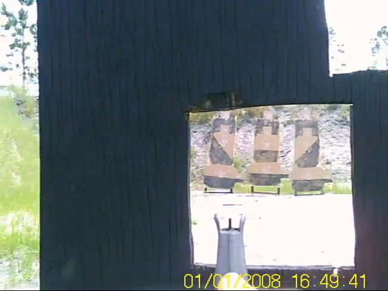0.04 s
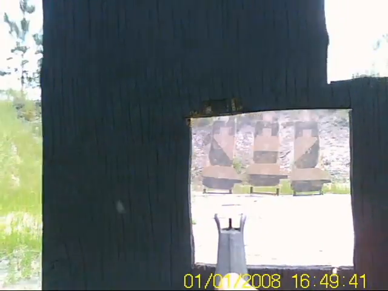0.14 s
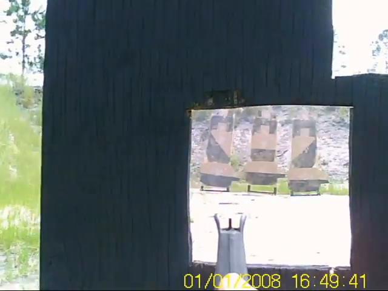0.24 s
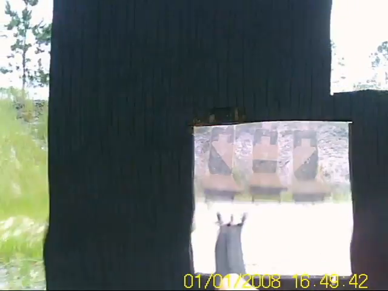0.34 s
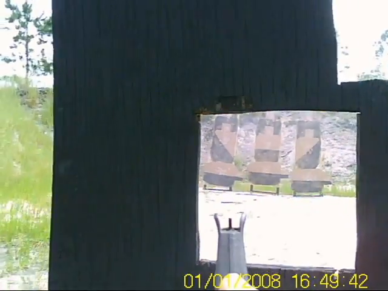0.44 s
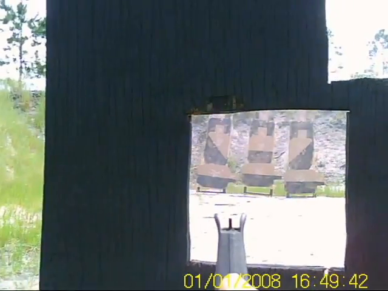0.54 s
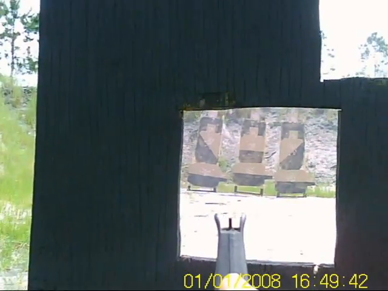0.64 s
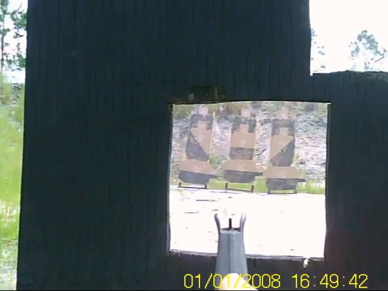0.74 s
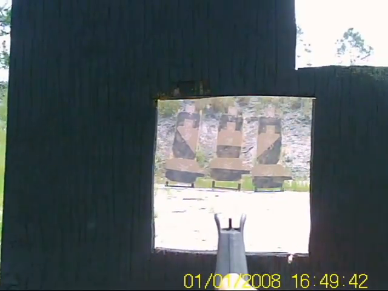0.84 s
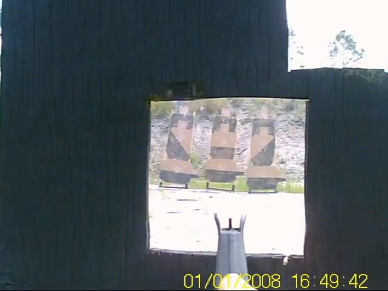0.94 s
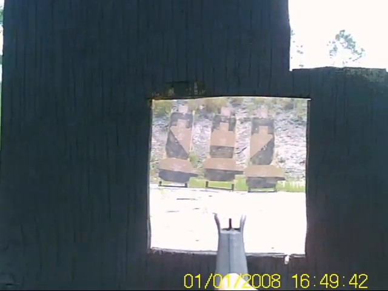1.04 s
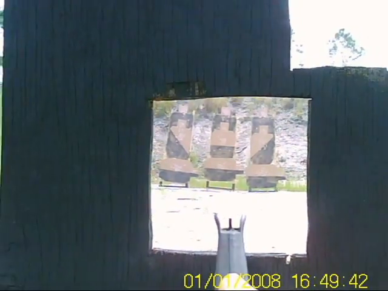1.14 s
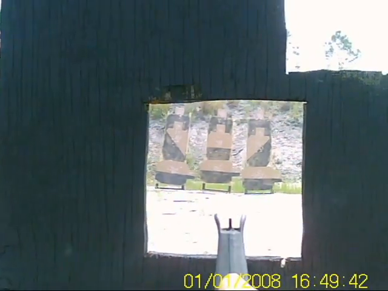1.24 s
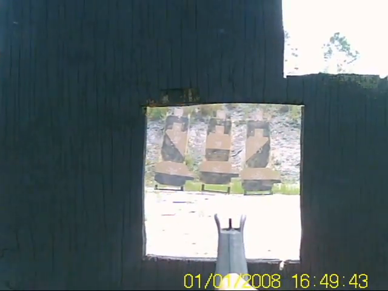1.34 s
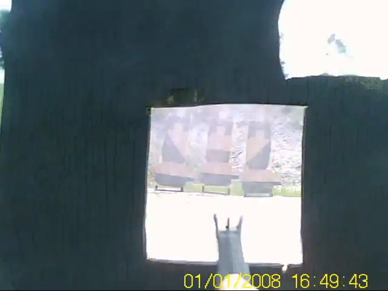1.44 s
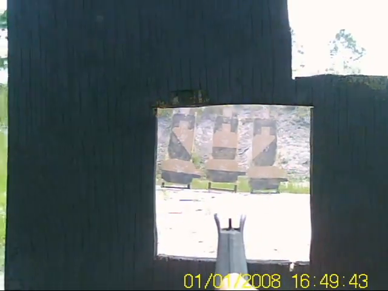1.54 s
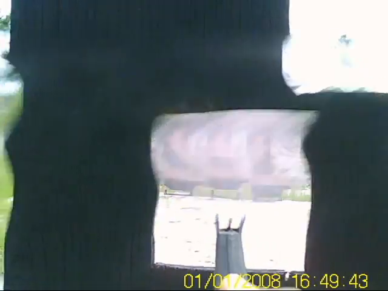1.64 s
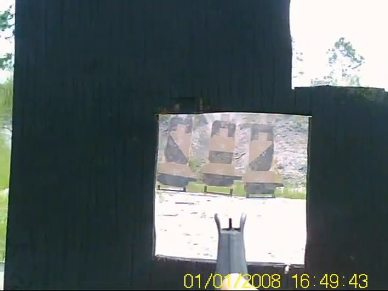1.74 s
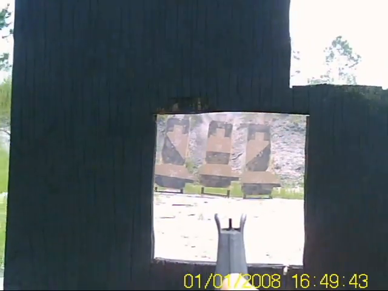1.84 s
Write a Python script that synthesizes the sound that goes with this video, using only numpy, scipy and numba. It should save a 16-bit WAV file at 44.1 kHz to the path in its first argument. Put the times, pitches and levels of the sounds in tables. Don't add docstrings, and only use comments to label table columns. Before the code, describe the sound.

Rifle shots in two quick pairs, very close and distorted, each with a thump; the bolt slams and rattles, a spring rings briefly, and small parts click in the pause at an outdoor range.

```python
import sys
import numpy as np
from scipy import signal
from scipy.fft import rfft, irfft
from scipy.io import wavfile
from scipy.ndimage import uniform_filter1d
from numba import njit

SR = 44100
rng = np.random.default_rng(int(sys.argv[2]) if len(sys.argv) > 2 else 0)


def makeup_ratio(level_db):
    decades = np.asarray(level_db, float) / 20
    return 10 ** decades


def store_pcm(level_fs):
    pcm = np.round(np.clip(level_fs, -1, 1) * 32767).astype(np.int16)
    wavfile.write(sys.argv[1], SR, np.atleast_2d(pcm).T)


N = 83790
T = np.arange(N) / SR

# (time [s], blast level [dB], recoil level [dB], pressure push [linear], echo level [dB])
SHOT_EVENTS = [
    (0.063, 6.5, -12.5, .5, -41.5),
    (.2795, 7.5, -11.5, 0.04, -42.5),
    (1.3883, 6, -12.5, 0.04, -40),
    (1.5998, 9, -11, 0.04, -44),
]
# (time [s], level [dB], burst length [s])
BOLT_SLAMS = [
    (.1297, -5, .002),
    (.3484, -6, .0018),
    (1.4632, -4, .0022),
]
# (frequency [Hz], width [Hz], level [dB])
STOCK_MODES = [(330, 300, -4), (870, 300, 0), (1500, 1000, -6)]


@njit
def svf(x, hz, width):
    y, b, l = np.empty(len(x)), 0., 0.
    for i in range(len(x)):
        g = np.tan(np.pi * hz[i] / SR)
        k = width[i] / hz[i]
        v = (b + g * (x[i] - l)) / (1 + g * (g + k))
        b = 2 * v - b
        l = l + 2 * g * v
        y[i] = k * v
    return y


def band(x, hz, width):
    one = np.ones(N)
    return svf(x, one * hz, one * width) * np.sqrt(SR / np.pi / width)


def shape(s, rise, hold, t60):
    release = np.clip(T - s - rise - hold, 0, 3)
    return np.clip((T - s) / rise, 0, 1) * makeup_ratio(-60 * release / t60)


def body(x, modes):
    one, out = np.ones(N), 0
    for k, (hz, width, db) in enumerate(modes):
        ringing = svf(band(x, hz, width), one * hz, one * width)
        out = out + (-1) ** k * makeup_ratio(db) * ringing
    return out


def tap(s, db, t60=0.034):
    push = shape(s, .0002, .0003, .0025)
    return makeup_ratio(db) * (push + .25 * shape(s, .0005, .001, t60))


def contact_noise():
    return np.sign(rng.standard_normal(N))


def shots():
    noise, out = rng.standard_normal((4, N)), 0
    for s, blast_db, recoil_db, push, _ in SHOT_EVENTS:
        hz = 890 + 6230 * np.exp(-np.abs(T - s - .003) / .0045)
        blast = band(noise[0], hz, 0.64 * hz)
        blast = blast + band(noise[1], 900., 500.)
        blast = blast + makeup_ratio(-4.5) * band(noise[2], 2000., 700.)
        blast = blast + makeup_ratio(-8.5) * band(noise[3], 350., 300.)
        blast = blast + push * shape(s + .0055, .001, .006, 0.0026)
        rise_s = .0018
        swell = shape(s, rise_s, 0.0095, 0.025)
        sag = shape(s, rise_s, 0.00033, 0.029)

        kick = band(noise[2], 1065, 1300.)
        kick = kick + makeup_ratio(-10.5) * band(noise[1], 300., 300.)
        kick = kick + makeup_ratio(-42) * band(noise[3], 4530, 4000.)
        thump = shape(s + 0.015, 0.009, 0.0049, 0.031)
        thump = thump + 0.067 * shape(s + 0.0063, 0.0014, 0.019, 0.25)
        out = out + makeup_ratio(blast_db) * swell * sag * blast + makeup_ratio(recoil_db) * thump * kick
    return out


def bolt():
    # (time [s], level [dB])
    rattle_taps = [(.1005, -22.5), (.1142, -23.5), (.117, -16), (.1242, -29), (.1285, -21), (.142, -25),
                   (.1458, -22), (.150, -60), (.319, -19), (.323, -41), (.3346, -23), (.3385, -24),
                   (0.3454, -20), (.354, -26.5), (.361, -25), (.365, -20), (.3695, -31.5), (0.3756, -30),
                   (1.4275, -23.5), (1.4365, -13), (1.4465, -24.5), (1.452, -19), (1.461, -12),
                   (1.4725, -45), (1.4765, -20.5), (1.480, -26.5), (1.4865, -37), (1.639, -19.5),
                   (1.647, -30.5)]
    # (frequency [Hz], width [Hz], level [dB])
    receiver_modes = [(1450, 1100, -5), (2050, 900, 0), (2600, 700, -1), (4250, 800, -4), (6500, 2000, -9),
                      (10500, 6000, -19)]
    rattle = sum(tap(s, db) for s, db in rattle_taps)
    slam = sum(makeup_ratio(db - 2.5) * shape(s, 0.00051, burst, 0.007) for s, db, burst in BOLT_SLAMS)

    grains_per_s, chatter_db, stop_t60_s = 5000, -34.5, .07
    grains = rng.random(N) < grains_per_s / SR
    grit = grains * makeup_ratio(2.7 * rng.exponential(size=N)) * rng.standard_normal(N) * 2
    moving = sum(shape(shot[0] + 0.015, 0.025, home[0] - shot[0] - .03, stop_t60_s)
                 for shot, home in zip(SHOT_EVENTS, BOLT_SLAMS))
    metal = (rattle + slam) * contact_noise() + grit * makeup_ratio(chatter_db) * moving
    return body(metal, receiver_modes) + body(makeup_ratio(-12) * slam * contact_noise(), STOCK_MODES)


def small_parts():
    # (time [s], level [dB], dullness [0-1])
    knock_taps = [(.027, -85, 0), (.1683, -23, .4), (.172, -21, 0.1), (0.1765, -33, 1), (.187, -54, .1),
                  (0.24, -48, .1), (.384, -41, .1), (.408, -48, 0.12), (.437, -40.5, 0.2),
                  (0.461, -38, 0.2), (0.4849, -40, 0), (0.493, -49.5, 0.3), (1.3598, -53.5, .85),
                  (1.513, -34.5, 0.08), (1.5525, -38, .1), (1.573, -41, 0), (1.667, -30, 0.93),
                  (1.675, -34.5, 0.4), (1.689, -52, 0.51), (1.708, -34.5, .15), (1.851, -62, 0.92)]
    # (frequency [Hz], width [Hz], level [dB])
    guard_modes = [(2150, 1100, 0), (4300, 1600, -8), (6500, 3000, -16)]
    hammer_lead_s, hammer_db = 0.0078, -24
    bright = sum(tap(shot[0] - hammer_lead_s, hammer_db, 0.013) for shot in SHOT_EVENTS)
    dull = 0
    for s, db, dullness in knock_taps:
        share = np.clip(dullness, 0, 1)
        bright = bright + (1 - share) * tap(s, db, 0.042)
        dull = dull + share * tap(s, db, 0.028)
    return body(dull * contact_noise(), STOCK_MODES) + body(bright * contact_noise(), guard_modes)


def spring():
    # (frequency [Hz], width [Hz], level [dB])
    spring_modes = [(2050, 700, -3), (2550, 700, 0), (4700, 2000, -9), (5900, 450, -12), (7800, 3000, -19)]
    ring = sum(shape(home[0], .005, .005, 0.43) * shape(home[0], .005, .13, 0.23) for home in BOLT_SLAMS)
    steps = np.repeat(rng.standard_normal(N // 200 + 1), 200)[:N]
    flicker_db = 3 * uniform_filter1d(steps, size=200)
    return body(rng.standard_normal(N) * makeup_ratio(-41.5 + flicker_db) * ring, spring_modes)


def range_echo():
    # (frequency [Hz], level [dB], decay by 60 dB [s])
    echo_bands = [(130, -16, 1), (350, -3, .5), (800, -1, .4), (1880, -8, 0.58), (4000, -9.5, .35),
                  (8000, -12, .3)]
    out = 0
    for hz, db, t60 in echo_bands:
        echo = band(band(rng.standard_normal(N), hz, .8 * hz), hz, 0.76 * hz)
        decay = sum(makeup_ratio(shot[4] + db) * shape(shot[0], .01, .02, t60) for shot in SHOT_EVENTS)
        out = out + echo / echo.std() * decay
    return out


def electronics():
    # (frequency [Hz], density [dB per Hz])
    hiss_curve = np.array([(30, -6), (100, -1), (160, -12), (900, -11), (4000, -12.5), (9500, -14),
                           (12000, -20), (15000, -27.5)])
    # (frequency [Hz], level [dB])
    whine_tones = [(1200, -86), (3892, -85.5), (5599, -85.5), (6202, -91.5), (7402, -88), (9598, -89)]
    hz = np.fft.rfftfreq(N, 1 / SR) + 1
    tilt = makeup_ratio(np.interp(np.log(hz), np.log(hiss_curve[:, 0]), hiss_curve[:, 1]))
    hiss = irfft(rfft(rng.standard_normal(N)) * tilt * (hz > 22), N)
    tones = sum(makeup_ratio(db) * np.sqrt(2) * np.sin(2 * np.pi * (f * T + rng.random())) for f, db in whine_tones)
    return makeup_ratio(-76) * hiss / hiss.std() + tones


def scene():
    return (shots() + bolt() + small_parts() + spring() + range_echo())[None]


def butter(x, order, hz, kind="low"):
    return signal.sosfilt(signal.butter(order, hz, kind, fs=SR, output="sos"), x)


def low_pass(x):
    return signal.sosfilt(signal.butter(12, 16490, fs=SR, output="sos"), x)


def record(dry):
    # (time [s], gain [dB])
    gain_steps = np.array([
        (0, 12.5),
        (.0727, -1),
        (.27, -1),
        (.52, 1.5),
        (1.59, 1.5),
    ])
    ceiling = np.where(dry > 0, 0.14, 0.66)
    knee = np.where(dry > 0, 4., 1)
    x = dry / (1 + np.abs(dry / ceiling) ** knee) ** (1 / knee)
    x = butter(x, 1, 12, "high")
    x = butter(x, 3, 7978)
    current = np.searchsorted(gain_steps[1:, 0], T)
    gain = uniform_filter1d(makeup_ratio(gain_steps[current, 1]), size=9)
    full_scale, offset = .68, -.0047
    x = np.clip(x * gain, -full_scale, full_scale) + electronics()
    return low_pass(butter(x, 8, 13500) + offset)


dry = scene()
out = record(dry)
store_pcm(out)
```